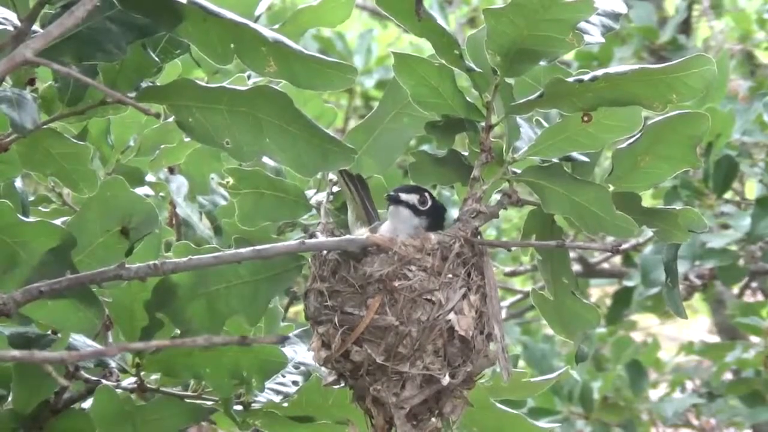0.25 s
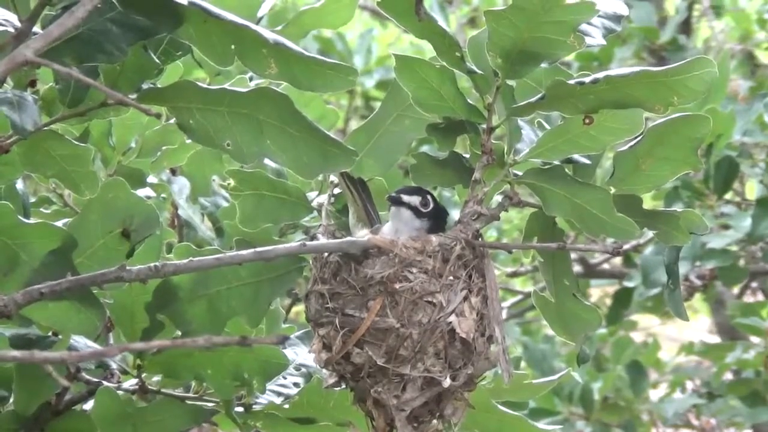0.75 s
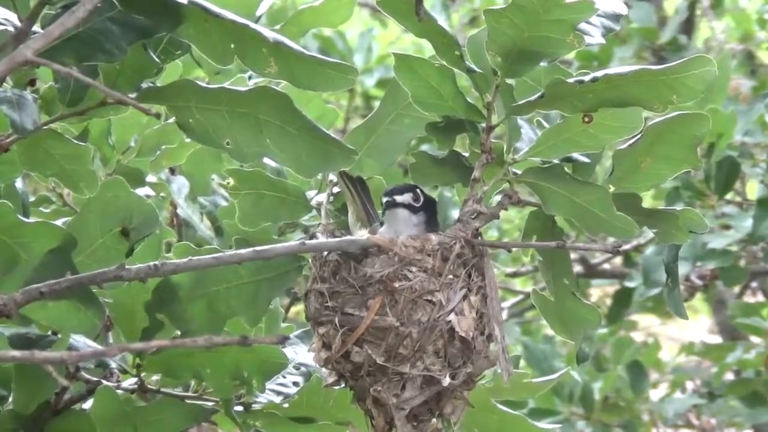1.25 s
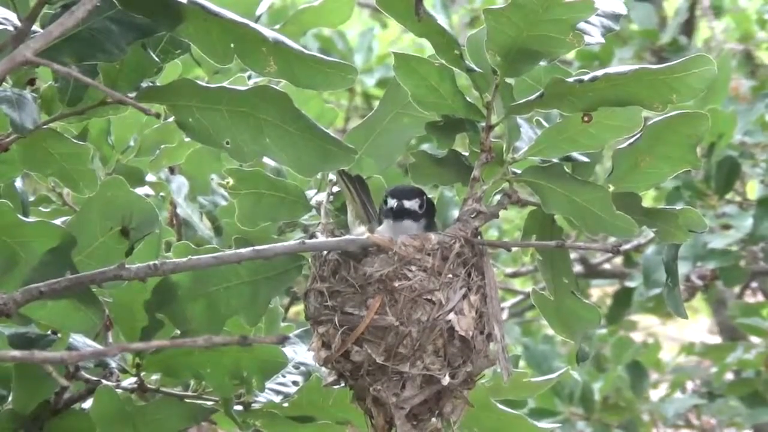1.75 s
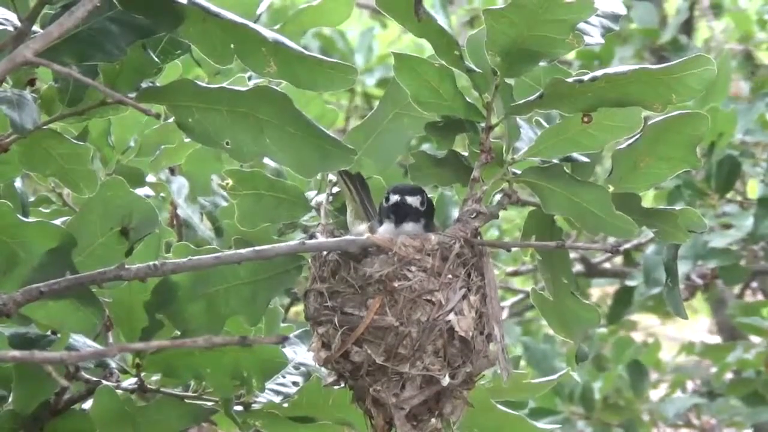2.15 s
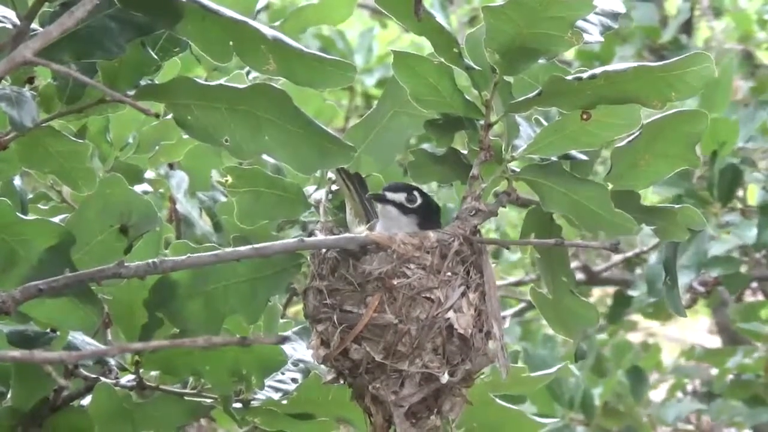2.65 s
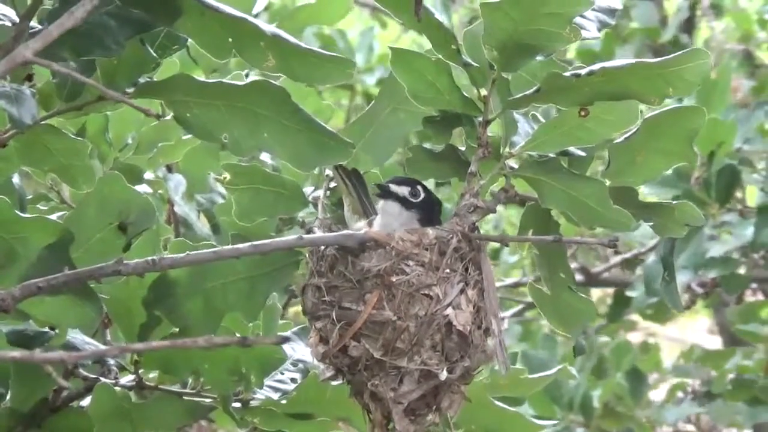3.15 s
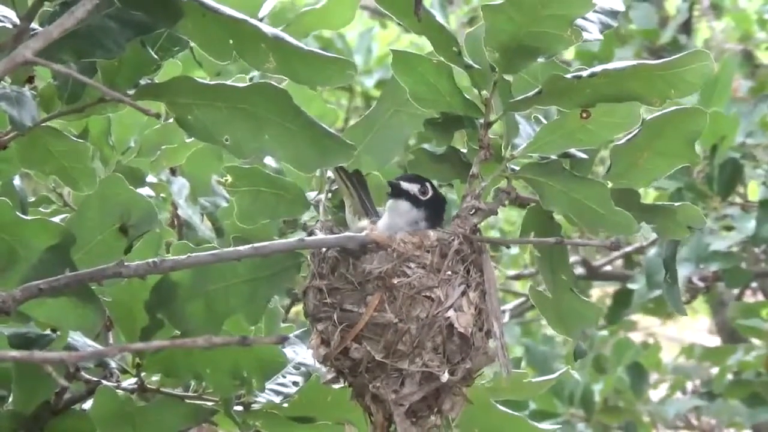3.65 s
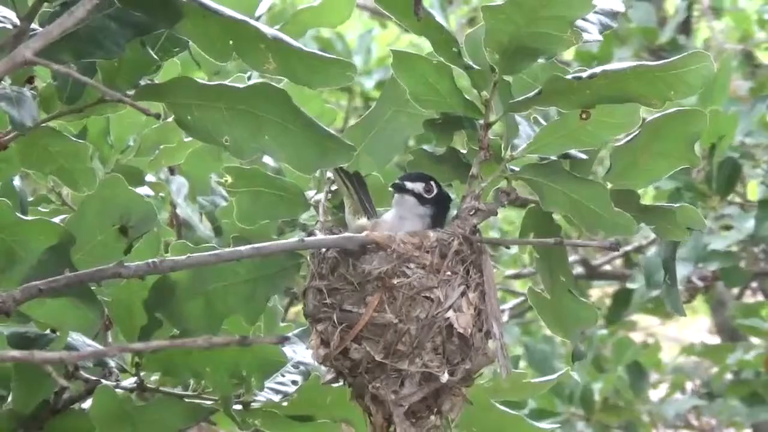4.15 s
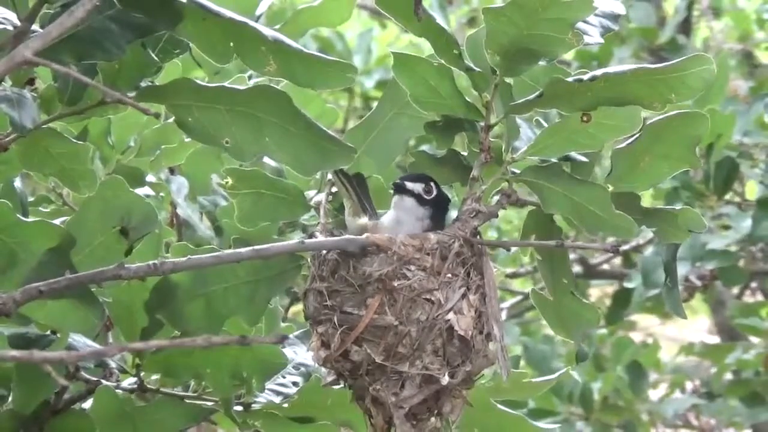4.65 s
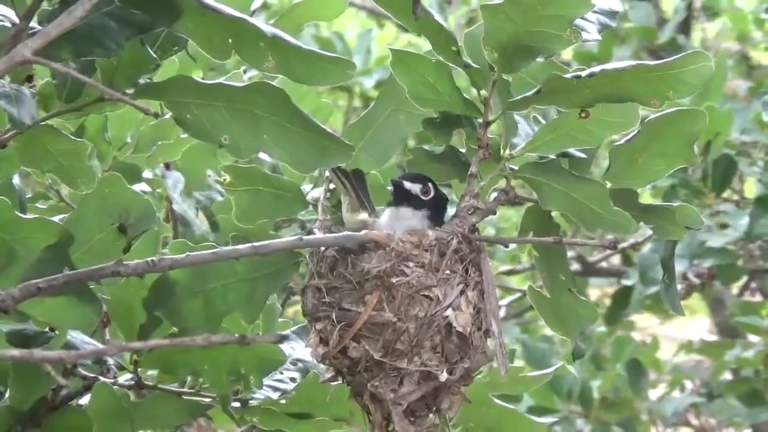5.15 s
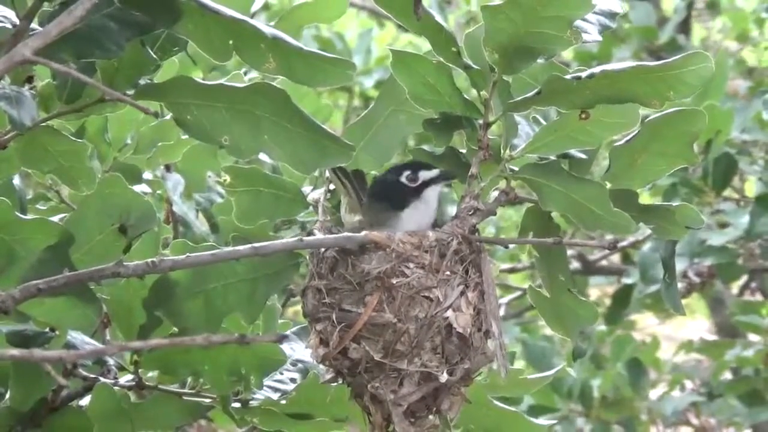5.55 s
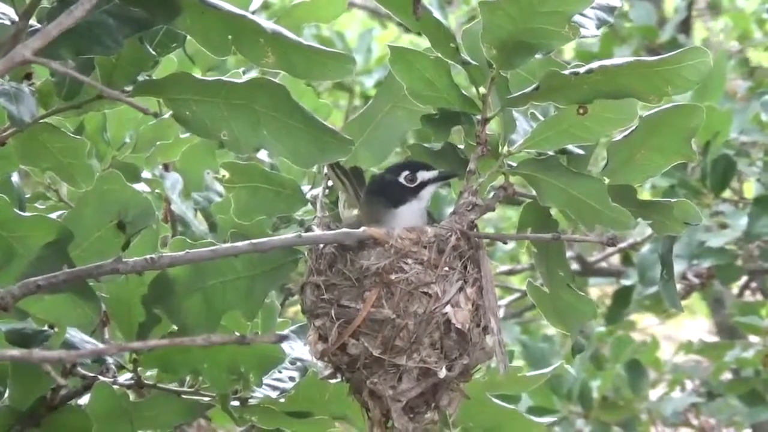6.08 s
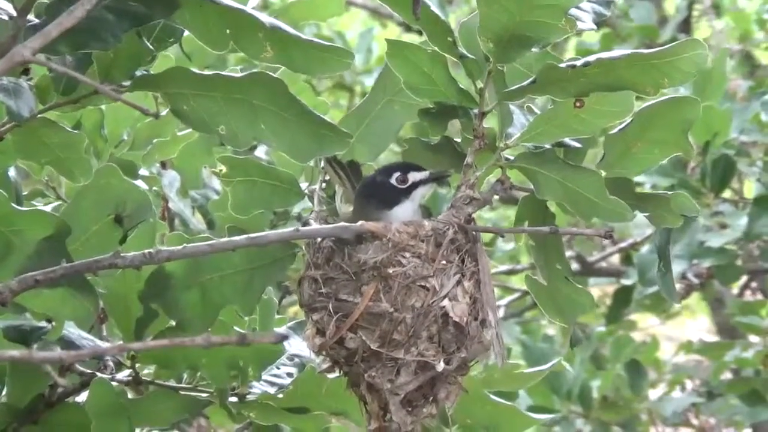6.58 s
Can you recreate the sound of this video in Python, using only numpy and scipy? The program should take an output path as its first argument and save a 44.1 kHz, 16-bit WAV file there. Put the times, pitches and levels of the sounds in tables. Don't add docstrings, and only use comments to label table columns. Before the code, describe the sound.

Close, dry birdsong: rapid chirps, a harsh scold, buzzy trills and sliding whistles with short gaps, above a faint low hum and leafy hush.

```python
import sys
import numpy as np
from scipy import signal
from scipy.fft import rfft, irfft
from scipy.io import wavfile
from scipy.ndimage import uniform_filter1d

SR = 44100
rng = np.random.default_rng(int(sys.argv[2]) if len(sys.argv) > 2 else 0)


def file_out(sig):
    cols = np.atleast_2d(sig).T
    lim = np.clip(cols, -1, 1)
    pcm = np.round(lim * 32767).astype(np.int16)
    wavfile.write(sys.argv[1], SR, pcm)


def gain_from_decibels(decibels):
    exponent = np.asarray(decibels, float) / 20
    return 10 ** exponent


N = 300762



def singer():
    song = clear_song() + stroke_song() + rasp() + rough_calls() + warbles() + duets()
    return song + windpipe_hiss(song)


def clear_song():
    # (overtone levels_db, notes of (s, pitch_hz, level_db))
    pickup, pickup_low = [(0., -27, -35), [[(2.022, 3270, -49), (2.028, 3820, -29), (2.033, 3900, -34),
                          (2.036, 4600, -36)]]], [(0., -10, -24), [[(2.029, 2400, -48), (2.035, 2960, -32.5),
                                          (2.04, 3120, -45), (2.048, 2950, -43)]]]
    chip_lead, chip, slide = [(0., -32), [[(2.805, 5710, -41), (2.81, 6450, -39), (2.814, 7200, -39),
                              (2.8165, 7000, -36), (2.8185, 5660, -24.5), (2.8205, 4680, -18),
                              (2.823, 3660, -36.5), (2.828, 2700, -47)]]], [(-25, 1, -19, -38), [[(2.819, 4510, -44),
                                                 (2.825, 2950, -19.5), (2.8295, 2350, -14),
                                                 (2.8315, 2180, -27), (2.836, 2150, -25),
                                                 (2.841, 2600, -16), (2.845, 2830, -21), (2.85, 2720, -28),
                                                 (2.856, 2650, -45)]]], [(-24.5, -10.5, 1.5, -20, -28.5, -30.5, -35),
                                                               [[(3.033, 1910, -45), (3.039, 1776, -40.5),
                                                               (3.048, 1637, -29), (3.058, 1512, -28.5),
                                                               (3.068, 1430, -27), (3.077, 1416, -32.5),
                                                               (3.082, 1310, -44)]]]
    hook_first, chevron_rises = [(0.,), [[(4.719, 5400, -28), (4.724, 6170, -28), (4.729, 7000, -35),
                                 (4.733, 7270, -32.5), (4.738, 6580, -28), (4.741, 6200, -26)]]], [(-2.5, -36.5, -42, -33), [ [(3.452, 1900, -40),
                                                     (3.456, 2510, -32), (3.463, 3200, -20.5),
                                                     (3.469, 3760, -24), (3.471, 4300, -33),
                                                     (3.475, 5300, -40), (3.479, 6600, -52)],
                                                     [(3.534, 2570, -33), (3.54, 2920, -19),
                                                     (3.547, 3290, -15), (3.555, 3720, -18.5),
                                                     (3.557, 4420, -28), (3.56, 5200, -36),
                                                     (3.563, 5800, -44)], [(3.637, 1900, -43),
                                                     (3.641, 2700, -26), (3.647, 3250, -16),
                                                     (3.6545, 3750, -19), (3.656, 4400, -29),
                                                     (3.659, 5200, -38), (3.663, 5800, -46)]]]
    scoop, step_lead = [(0., -36, -43), [[(4.495, 2800, -39.5), (4.503, 2676, -26), (4.51, 2605, -32.5),
                        (4.517, 2375, -44), (4.527, 2775, -37.5), (4.533, 3380, -10)],
                        [(4.504, 5330, -55.5), (4.517, 4890, -41), (4.523, 5000, -38),
                        (4.531, 6300, -54.5)]]], [(-16, 0., -22), [[(5.319, 1360, -41), (5.324, 1520, -36.5),
                                       (5.329, 1780, -30.5), (5.336, 2650, -35)]]]
    # (overtone levels_db, notes of (s,
    # pitch_hz, level_db))
    steps = [(0., -31, -33), [ [(5.331, 2100, -35), (5.334, 2470, -26), (5.338, 2840, -20),
             (5.341, 2600, -21), (5.344, 2220, -31.5)], [(5.35, 2970, -36), (5.353, 3150, -22),
             (5.357, 2814, -19.5), (5.36, 2460, -21), (5.363, 2190, -36)], [(5.367, 3350, -30),
             (5.371, 3600, -19.5), (5.375, 3620, -18.5), (5.3775, 3130, -15), (5.38, 2710, -33.5)],
             [(5.385, 4600, -26), (5.388, 4220, -14), (5.392, 4410, -9.5), (5.394, 3980, -15),
             (5.397, 3300, -30)], [(5.402, 5330, -27), (5.405, 4800, -12.5), (5.409, 4820, -10),
             (5.412, 4230, -11.5), (5.414, 3700, -28)], [(5.421, 6500, -31.5), (5.424, 5260, -17.5),
             (5.426, 4750, -8.5), (5.429, 4260, -15), (5.433, 5000, -24)]]]
    # (overtone levels_db, rows of (s from crest, pitch_hz, level_db))
    chevron, hook, hook_rise = [
        [(0, -34, -40.5, -31), [(-.012, 5830, -50), (-.006, 4240, -26), (0, 3135, -15), (.009, 2410, -22),
         (.016, 2150, -36.5), (.024, 2090, -48)]],
    ], [
        [(0., -27.5), [(-.0055, 6620, -17.5), (-.003, 5670, -11), (.001, 4996, -10), (.005, 4500, -17.5),
         (.008, 4380, -31.5)]],
    ], [
        [(0.,), [(-.028, 5770, -30.5), (-.021, 6490, -27), (-.016, 7050, -27), (-.011, 7260, -26),
         (-.007, 7100, -26.5), (-.004, 6350, -23)]],
    ]
    dip = [
        [(0.5, -40.5, -30.5, -27.5), [(-.012, 4010, -27.5), (-.008, 3860, -22.5), (0, 3140, -12.5),
         (.007, 2255, -28), (.011, 1890, -36.5), (.0145, 1750, -53)]],
        [(-3, -34, -35.5, -31.5), [(.0145, 1756, -45), (.021, 1996, -30), (.028, 2370, -28),
         (.035, 2644, -33.5), (.042, 2720, -40)]],
    ]
    whine = [
        [(-16.5, -0.5, -21.5, -44, -35, -33.5), [(-.012, 1750, -35), (-.008, 1738, -29.5), (0, 1685, -28.5),
         (.017, 1515, -30.5), (.027, 1310, -34), (.034, 1087, -47.5), (.045, 950, -62)]],
    ]
    # (crest_s, pitch factor, length factor, effort_db of each part)
    chevron_at, hook_at, hook_rise_at = [(3.492, 1.02, 1.02, 0.05), (3.574, 1.005, 1.06, .5),
                                         (3.673, .99, 0.95, -0.57)], [(4.745, 1., 1.05, -1.4), (4.804, 1., 0.85, 0.),
                                                             (4.869, 1, 0.92, -0.47)], [(4.805, 1., 1.03, -1),
                                                                              (4.869, 0.98, 1.04, -1)]
    dip_at, whine_at = [(5.477, 1.014, .98, 0.46, 1.4), (5.554, 0.97, 1.02, -0.32, -0.76)], [(6.691, 0.98, 0.99, -1.5), (6.764, 0.98, 1.08, 0.27)]

    syllables = [pickup, pickup_low, chip_lead, chip, slide, hook_first, chevron_rises]
    syllables += [scoop, step_lead, steps]
    syllables += repeated(chevron, chevron_at)
    syllables += repeated(hook, hook_at) + repeated(hook_rise, hook_rise_at)
    syllables += repeated(dip, dip_at) + repeated(whine, whine_at)
    return whistles(syllables, rough=0.03)


def stroke_song():
    # (start_s, length_s, start_hz, end_hz, crest_db)
    glides = [(.034, 0.011, 3240, 2900, -39.5), (3.077, 0.013, 3010, 1880, -35.5),
              (3.078, 0.0076, 6100, 4100, -34), (3.085, 0.014, 4100, 3100, -35.5),
              (2.83, 0.011, 6550, 6350, -28), (6.72, .012, 3800, 2700, -42), (6.795, .012, 3800, 2400, -47),
              (2.131, .006, 4800, 4700, -33), (2.19, .005, 4800, 4700, -37), (3.317, .006, 3600, 3650, -45),
              (3.478, .005, 6900, 5900, -45), (3.454, 0.017, 1450, 1600, -59),
              (2.858, .008, 1850, 1800, -52), (2.071, 0.0066, 4350, 4500, -33),
              (6.368, 0.035, 7500, 5100, -43), (6.375, 0.029, 9100, 8500, -51),
              (6.378, 0.018, 11050, 11000, -51), (6.395, 0.011, 11100, 10200, -31),
              (4.55, 0.0082, 4900, 5200, -46.5), (4.561, 0.012, 5000, 4200, -44),
              (6.346, 0.02, 8860, 9330, -35)]
    return whistles([([0.], strokes(glides, ends_db=-2.5))], rough=0.038)


def rasp(width_hz=180):
    # (s, centre_hz, level_db)
    slack = [(3.082, 3016, -39.5), (3.095, 2900, -43), (3.115, 3150, -40), (3.135, 3310, -43.5),
             (3.15, 3500, -61)]
    out, t = np.zeros(N), span(slack)
    hz, flow = muscles(slack, t)
    hz = hz + width_hz * drift(len(t), 30)
    flow = flow * drift(len(t), 21.5)
    add(out, t, partial(hz, flow, rough=0.21))
    return out


def rough_calls():
    # (overtone levels_db, notes of (s, pitch_hz, level_db))
    chip_breath, buzz = [(-22, 0.), [[(2.795, 2050, -52), (2.799, 2180, -43), (2.805, 2410, -40),
                         (2.809, 2700, -52)]]], [(-51, -37, -16, -13, -36, 1.5, -10, 1.5, 0.5, -6, -28, -2.5, -9, -15),
                                              [[(4.196, 580, -46), (4.203, 730, -34), (4.209, 776, -33),
                                              (4.216, 797, -29.5), (4.225, 763, -31), (4.231, 727, -33),
                                              (4.238, 630, -47)]]]
    # (overtone levels_db, rows of (s from crest, pitch_hz, level_db))
    trill = [
        [(0., -29), [(-.011, 2876, -44), (-.005, 3790, -27.5), (-.002, 4510, -10.5), (.001, 5080, -11.5),
         (.003, 5700, -26), (.0055, 6690, -30.5), (.009, 7440, -35), (.014, 7150, -38), (.02, 6450, -37.5)]],
        [(-17.5, 2.5, -20, -24.5), [(.02, 1763, -33), (.024, 2050, -27.5), (.027, 2332, -21), (.031, 2385, -32),
         (.035, 2320, -43.5)]],
        [(0.,), [(.003, 5120, -26), (.006, 5150, -21), (.01, 4570, -34.5), (.015, 4945, -30.5),
         (.0185, 4860, -35), (.021, 5220, -20.5), (.023, 5250, -31)]],
    ]
    # (crest_s, pitch factor, length factor, first effort_db, second effort_db)
    trill_at = [(3.195, 1.01, 0.98, -4.5, 1.5), (3.26, 1.04, 0.99, -1, 2), (3.33, 1.0, 1.01, 0, -4.5)]
    out = whistles([chip_breath], rough=.5)
    out += gaping(whistles([buzz], rough=0.08, bright=.1))
    return out + whistles(repeated(trill, trill_at), rough=0.16)


def warbles():
    # (overtone levels_db, one note of (s, pitch_hz, level_db))
    high, falling = [(-18, 0.0, -21), [[(4.257, 2920, -25), (4.264, 3010, -26), (4.267, 2940, -19),
                     (4.278, 2760, -23), (4.285, 2760, -28), (4.29, 2740, -38)]]], [(0, -37, -55.5), [[(4.533, 3610, -12.5), (4.537, 3610, -12.5),
                                          (4.546, 3470, -24), (4.552, 3010, -19.5), (4.56, 2650, -25.5),
                                          (4.571, 2355, -30.5), (4.587, 1930, -55)]]]
    out = warble(high, crest_s=4.2635, rate_hz=118.0, depth_hz=300)
    return out + warble(falling, crest_s=4.5365, rate_hz=86, depth_hz=250)


def duets():
    # (overtone levels_db, notes of (s, pitch_hz, level_db))
    harsh = [
        [(-20, -13.5, 0, -3, 0, 3.5, -13), [ [(1.734, 1576, -58), (1.742, 1580, -41), (1.752, 1590, -34.5),
         (1.763, 1662, -36.5), (1.775, 1632, -33.5), (1.79, 1553, -32), (1.811, 1463, -34),
         (1.835, 1370, -38.5), (1.841, 1360, -54)], ]],
        [(-12.5, -1, 7, -6), [ [(1.738, 2416, -58), (1.75, 2650, -43), (1.763, 2815, -35.5), (1.772, 2700, -36),
         (1.781, 2420, -45), (1.79, 2358, -40), (1.82, 2203, -43), (1.844, 2040, -42), (1.852, 2040, -61)], ]],
    ]
    level = [
        [(-21.5, 2, -17, -34), [ [(5.09, 2410, -37.5), (5.097, 2646, -25.5), (5.103, 2627, -21),
         (5.112, 2590, -18), (5.126, 2820, -19), (5.144, 2856, -25.5), (5.16, 2820, -45.5)],
         [(5.173, 2450, -28.5), (5.181, 2560, -15.5), (5.196, 2650, -20), (5.204, 2690, -17.5),
         (5.215, 2820, -18.5), (5.226, 2750, -22), (5.238, 2810, -33.5), (5.25, 2790, -53)]]],
        [(-30.5, -18.5, 2, -19.5, -17, -21), [ [(5.099, 1740, -40), (5.105, 1735, -26), (5.111, 1693, -18.5),
         (5.119, 1588, -23), (5.127, 1590, -24), (5.135, 1686, -25), (5.141, 1680, -28.5), (5.147, 1665, -46)],
         [(5.183, 1765, -38), (5.189, 1772, -26), (5.196, 1697, -21.5), (5.203, 1552, -23), (5.21, 1668, -26),
         (5.219, 1798, -23), (5.229, 1910, -30.5), (5.239, 1955, -43)]]],
    ]
    scold = [
        [(-26, 0., -18), [[(0., 3007, -21), (.01, 2993, -17.5), (.022, 2915, -25), (.03, 2897, -18),
         (.037, 2850, -27.5), (.046, 2650, -35)]]],
        [(0., -18.5), [[(0., 5140, -26), (.004, 4740, -35), (.008, 5060, -34), (.014, 4500, -33),
         (.02, 5040, -36), (.025, 5090, -30), (.032, 4650, -37), (.042, 4950, -48)]]],
    ]
    mutter = [
        [(-13, 0., -12.5), [[(4.476, 1530, -38), (4.483, 1840, -35.5), (4.489, 1850, -35.5),
         (4.497, 1810, -53)]]],
        [(0., -26), [[(4.478, 2740, -41), (4.487, 2960, -37), (4.495, 2770, -30), (4.5, 2730, -36)]]],
    ]
    squeak = [
        [(-16, -7, 0, 1.5, -24), [[(6.335, 2110, -51), (6.349, 2148, -36), (6.357, 2861, -28.5),
         (6.363, 3080, -22.5), (6.373, 2990, -63)]]],
        [(-27, -1, -13, 10.5, -3), [[(6.344, 1500, -52), (6.353, 1910, -49), (6.361, 2263, -36),
         (6.37, 2740, -55)]]],
    ]
    # (overtone levels_db, rows of (s from crest, pitch_hz, level_db))
    rising = [
        [(-45.5, 0., -19.5), [(-.009, 1748, -40.5), (0, 2370, -12.5), (.007, 2900, -21.5), (.014, 3120, -20.5),
         (.019, 3075, -24.5), (.024, 3010, -42)]],
        [(-4, 0., -13.5), [(-.012, 1777, -56), (-.007, 2454, -39), (-.002, 3065, -36), (.006, 3430, -32.5),
         (.013, 3740, -32), (.024, 3700, -57)]],
        [(0.,), [(-.008, 1786, -48), (0, 2390, -43.5), (.007, 2970, -32), (.014, 3174, -31), (.025, 2975, -37)]],
    ]
    # (crest_s, pitch factor, length factor, first effort_db, second effort_db)
    rising_at = [(2.0825, 0.995, 1.08, -4, 4), (2.1425, 1.02, 1.04, 0.5, 2), (2.205, 1.015, 1.01, -1.5, 2.)]
    shake = {"rasp": .2, "rising": .14, "level": .07, "scold": .14, "mutter": .08}

    *sides, lone = repeated(rising, rising_at)
    out = whistles([lone], rough=0.038)
    out += duet(sides, shake["rising"], cross_db=3.5, fall_db=10.0, beak_hz=7000, beak_width_hz=3650)
    out += duet(scold, shake["scold"], cross_db=-10.5, fall_db=1.5, beak_hz=6300, beak_width_hz=2500)
    out += duet(mutter, shake["mutter"], cross_db=-9.5, fall_db=2, beak_hz=4800, beak_width_hz=1500)
    out += duet(squeak, rough=0.27, cross_db=-3.5, fall_db=-1.0, beak_hz=9000, beak_width_hz=2400)
    out += duet(level, shake["level"], cross_db=-2.0, fall_db=5.5, beak_hz=6300, beak_width_hz=2200)
    return out + gaping(duet(harsh, shake["rasp"], cross_db=5.5, fall_db=3.5,
                             beak_hz=7200, beak_width_hz=2930, bright=0.3))


def windpipe_hiss(song, hiss_db=-30):
    # (pitch_hz, level_db)
    breath = [(1200, -22), (2000, -16.5), (4000, -2.5), (5500, 2.5), (7000, -1.5), (9500, 0), (11500, -1.5)]
    flow = abs(uniform_filter1d(song ** 2, 700)) ** 0.39
    colour = gain_from_decibels(read(breath, np.fft.rfftfreq(N, 1 / SR)))
    hiss = irfft(rfft(rng.standard_normal(N)) * colour, N)
    return gain_from_decibels(hiss_db) * flow * evened(hiss)


def gaping(x, steep=8):
    # (s, highest pitch let out_hz)
    gape = [(1.735, 5200), (1.75, 8300), (1.77, 11500), (1.81, 11500), (1.85, 6500), (4.196, 5500),
            (4.205, 10500), (4.225, 11000), (4.238, 7000)]
    hz, t, z = signal.stft(x, SR, nperseg=128)
    top_hz = np.interp(t, *np.transpose(gape))
    z = z / np.sqrt(1 + (hz[:, None] / top_hz) ** (2 * steep))
    return signal.istft(z, SR, nperseg=128)[1][:N]


def whistles(syllables, rough, bright=0.041):
    out = np.zeros(N)
    for overtones_db, notes in syllables:
        for note in notes:
            t = span(note)
            add(out, t, voice(overtones_db, *muscles(note, t), rough, bright))
    return out


def warble(syllable, crest_s, rate_hz, depth_hz):
    out, (overtones_db, (note,)) = np.zeros(N), syllable
    t = span(note)
    hz, flow = muscles(note, t)
    swing_hz = depth_hz * np.cos(2 * np.pi * rate_hz * (t - crest_s))
    add(out, t, voice(overtones_db, hz + swing_hz, flow, rough=.08))
    return out


def duet(pair, rough, cross_db, fall_db, beak_hz, beak_width_hz, bright=.04):
    out, ((db_a, notes_a), (db_b, notes_b)) = np.zeros(N), pair
    for a, b in zip(notes_a, notes_b):
        t = span(a, b)
        (hz_a, flow_a), (hz_b, flow_b) = muscles(a, t), muscles(b, t)
        add(out, t, voice(db_a, hz_a, flow_a, rough, bright) + voice(db_b, hz_b, flow_b, rough))
        for m, n in np.ndindex(4, 8):
            times_b = n - 3 + (n > 2)
            hz = abs((m + 1) * hz_a + times_b * hz_b)
            beak = (hz > 1200) / (1 + ((hz - beak_hz) / beak_width_hz) ** 2) ** 2
            strength = gain_from_decibels(cross_db - fall_db * (m + abs(n - 2.5)))
            add(out, t, partial(hz, np.sqrt(flow_a * flow_b) * beak * strength, 2 * rough))
    return out


def voice(overtones_db, hz, flow, rough, bright=0.041, steady=0.16):
    hz = hz * (1 + 0.0857 * rough * drift(len(hz), 41))
    db = np.atleast_1d(overtones_db)
    crest = flow.max()
    effort = flow / crest
    above = np.arange(len(db)) - db.argmax()
    power = np.clip(1 + np.where(above > 0, bright, steady) * above, .55, 4)
    return sum(partial((k + 1) * hz, crest * gain_from_decibels(db[k]) * effort ** power[k], rough)
               for k in range(len(db)))


def muscles(note, t, fade_s=0.0017):
    s, pitch_hz, level_db = np.transpose(note)
    hz = uniform_filter1d(np.interp(t, s, pitch_hz), 100, mode="nearest")
    db = uniform_filter1d(np.interp(t, s, level_db), 60, mode="nearest")
    since_start = t - s[0] + (s[0] < fade_s)
    edges = np.clip(np.minimum(since_start, s[-1] - t) / fade_s, 0, 1)
    return hz, gain_from_decibels(db) * edges


def partial(hz, flow, rough):
    turns = np.cumsum(hz) / SR + rng.random()
    flutter = abs(1 + rough * drift(len(hz), 47))
    return np.sqrt(2) * flow * flutter * np.sin(2 * np.pi * turns) * (hz < SR / 3)


def repeated(gesture, repeats):
    syllables = []
    for k, (overtones_db, rows) in enumerate(gesture):
        notes = []
        for s, tune, pace, *efforts_db in repeats:
            effort_db = efforts_db[k % len(efforts_db)]
            notes.append(np.multiply(rows, (pace, tune, 1)) + (s, 0, effort_db))
        syllables.append((overtones_db, notes))
    return syllables


def strokes(rows, ends_db):
    return [[(s, a_hz, db + ends_db),
             (s + length / 2, (a_hz + b_hz) / 2, db),
             (s + length, b_hz, db + ends_db)] for s, length, a_hz, b_hz, db in rows]


def far_bird():
    # (start_s, length_s, start_hz, end_hz, crest_db)
    calls = [
        (2.335, .145, 4730, 2740, -65.5),
        (2.59, 0.045, 2540, 2480, -68),
        (2.64, .08, 2350, 1800, -74),
        (2.89, 0.11, 4150, 2750, -70),
        (3.405, 0.057, 3075, 3270, -64),
    ]
    return whistles([([0.], strokes(calls, ends_db=-2))], rough=0.12)


def branches(x, split_hz=4200):
    echo_s = (.0018, .003, .0047, .0066, .0103, .0135, .0166, .022)
    # (below the split_db, above the split_db)
    echo_db = [(-15, -29), (-11, -13.5), (-15.5, -30.5), (-21, -11), (-19, -17), (-23.5, -19.5),
               (-26.5, -20.5), (-30.5, -23.5)]
    hz = np.fft.rfftfreq(N, 1 / SR)
    high = 1 / (1 + (split_hz / (hz + 1)) ** 10)
    delays_s = np.add.outer(echo_s, rng.integers(0, 5, 2) / SR)
    echoes = 0
    for s, (low_db, high_db) in zip(delays_s, echo_db):
        colour = gain_from_decibels(low_db + (high_db - low_db) * high)
        echoes = echoes + colour * np.exp(-2j * np.pi * hz * s[:, None])
    return irfft(rfft(x) * echoes, N)


def woodland(x, near_db=-15, near_t60=0.057, far_db=-20, flutter=.7):
    # (pitch_hz, t60_s)
    far_trees = [(1500, 0.09), (3000, 0.24), (5500, 0.17), (9000, 0.23)]
    # (pitch_hz, level_db)
    scatter = [(1500, -9.5), (3000, -1), (5000, 1.5), (7200, 5), (9500, 3)]
    size = SR // 2
    taps = np.zeros((2, size))
    at = np.arange(100, size - 20, 20) + rng.integers(0, 20, (2, (size - 101) // 20))
    np.put_along_axis(taps, at, rng.choice([-1., 1.], at.shape), 1)
    taps += 0.54 * taps[::-1]
    hz, t, z = signal.stft(taps, SR, nperseg=128)
    z = z * gain_from_decibels(-60 * t / read(far_trees, hz)[:, None])
    trees = signal.istft(z, SR, nperseg=128)[1][:, :size]
    leaves = taps * gain_from_decibels(-60 * np.arange(size) / SR / near_t60)
    tail = gain_from_decibels(far_db) * trees / np.linalg.norm(trees[0])
    tail = tail + gain_from_decibels(near_db) * leaves / np.linalg.norm(leaves[0])
    x = x * (1 + flutter * drift(N, 50)) / np.sqrt(1 + flutter ** 2)
    x = irfft(rfft(x) * gain_from_decibels(read(scatter, np.fft.rfftfreq(N, 1 / SR))), N)
    return signal.fftconvolve(x[None], tail, axes=1)[:, :N]


def ports(x):
    # (pitch_hz, left leads_radians)
    lead = [(0, 0), (2670, 0.17), (4050, 0.2), (5000, 0.00064), (5770, 0.23), (7240, 0), (10900, -0.0)]
    # (pitch_hz, left minus right_db)
    lean = [(60, -3), (140, -3), (340, -1.5), (800, 2), (1910, 0), (4540, 1), (10800, 0)]
    hz, half = np.fft.rfftfreq(N, 1 / SR), np.array([[.5], [-.5]])
    shift = np.exp(1j * half * read(lead, hz))
    return irfft(rfft(x) * shift * gain_from_decibels(half * read(lean, hz)), N)


def head_turn(x):
    # (s, left minus right_db)
    head = [(0, 1.5), (1.8, -1), (2.15, -0.5), (2.83, -0.5), (3.07, -1), (3.27, -0.5), (3.57, -1.2),
            (4.25, -1), (4.54, -0.5), (4.8, -0.2), (5.15, -0.6), (5.39, -1.1), (5.55, -1), (6.36, -0.5),
            (6.75, -1)]
    lean_db = np.interp(np.arange(N) / SR, *np.transpose(head)) / 2
    return x * gain_from_decibels([lean_db, -lean_db])


def air(level_db=-55.5):
    # (pitch_hz, level_db per Hz)
    hush = [(15, -46), (25, -15), (92, -1), (179, -12.5), (262, -11), (322, -13), (375, -11.5), (693, -13),
            (895, -13.5), (1530, -19.5), (2420, -20.5), (9150, -24), (11200, -29), (14600, -72),
            (22000, -120)]
    # (pitch_hz, likeness [ratio])
    likeness = [(60, 1), (140, 0.96), (340, 0.646), (800, 0.44), (1910, 0.239), (4540, 0.52), (10800, 0.67)]
    frames, hz = N // 512 + 5, np.fft.rfftfreq(2048, 1 / SR)
    a, b, c, d, patches = rng.standard_normal((frames, 1025, 5)).T
    patches = evened(uniform_filter1d(uniform_filter1d(patches, 30, 0), 10, 1))
    same = np.clip(read(likeness, hz), -1, .988)[:, None]
    left = a + 1j * b
    right = same * left + np.sqrt(1 - same ** 2) * (c + 1j * d)
    z = np.array([left, right]) * gain_from_decibels(read(hush, hz)[:, None] + 0.64 * patches)
    return gain_from_decibels(level_db) * evened(signal.istft(z, nperseg=2048, noverlap=1536)[1][:, :N])


def evened(x):
    return x / np.sqrt(np.mean(x ** 2) + 1e-20)


def read(points, hz):
    f, value = np.transpose(points)
    return np.interp(np.log(hz + 1), np.log(f + 1), value)


def drift(size, smooth):
    once = uniform_filter1d(rng.standard_normal(size), int(smooth))
    return evened(uniform_filter1d(once, int(smooth)))


def span(*notes):
    start_s = min(note[0][0] for note in notes)
    end_s = max(note[-1][0] for note in notes)
    return np.arange(round(start_s * SR), round(end_s * SR)) / SR


def add(mix, t, sound):
    mix[round(t[0] * SR):][:len(t)] += sound


def scene():
    near, far = singer(), far_bird()
    bird = head_turn(ports(near + branches(near) + woodland(near + far)))
    return gain_from_decibels(-1.5) * bird + far * gain_from_decibels([[-1.5], [1.5]]) + air()


def roll_off(x):
    return signal.sosfilt(signal.butter(12, 11380, fs=SR, output="sos"), x)


def record(dry):
    low_pass = signal.firwin(401, 11055, window=("kaiser", 7), fs=SR)
    cut = signal.oaconvolve(dry, low_pass[None], "same")
    return roll_off(cut)


dry = scene()
out = record(dry)
file_out(out)
```